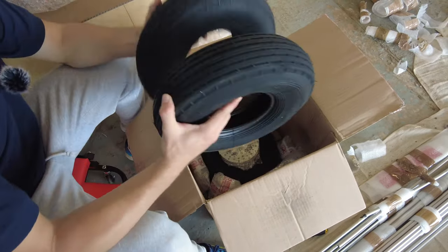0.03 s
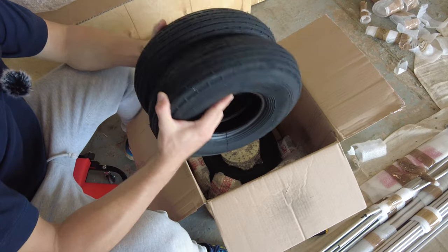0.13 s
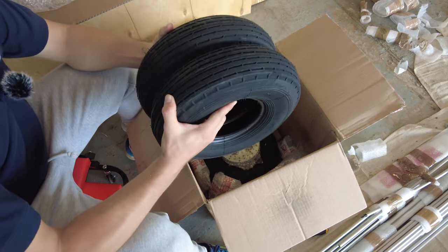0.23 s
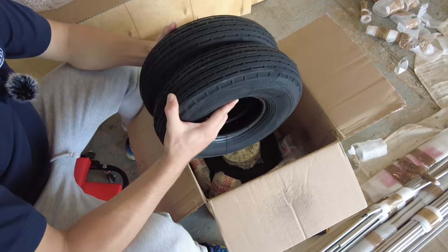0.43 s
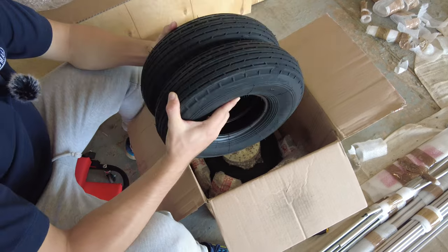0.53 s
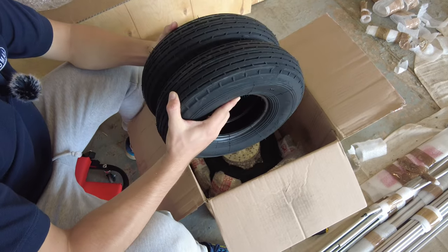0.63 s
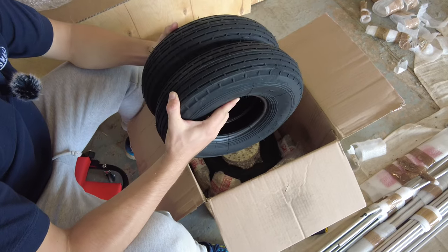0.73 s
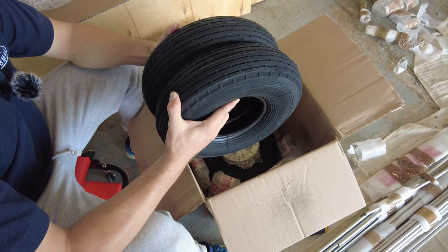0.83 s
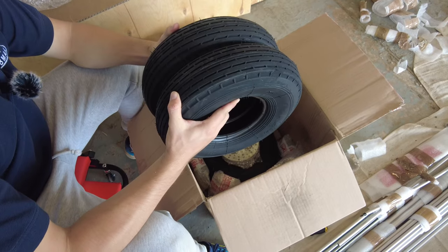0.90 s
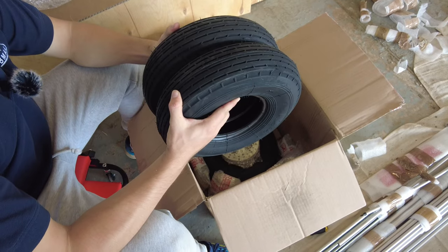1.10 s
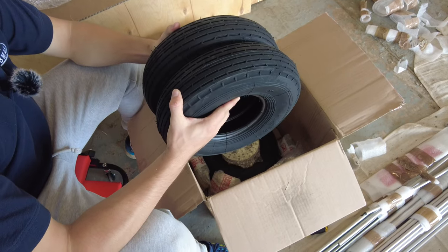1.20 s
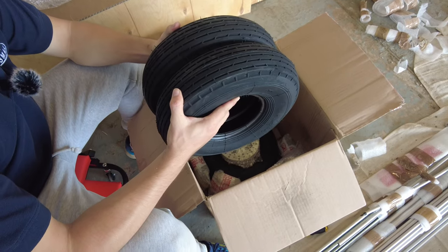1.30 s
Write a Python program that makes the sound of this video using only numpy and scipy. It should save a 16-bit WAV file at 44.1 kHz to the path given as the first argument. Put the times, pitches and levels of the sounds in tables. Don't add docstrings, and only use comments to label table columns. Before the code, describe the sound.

Hollow rubbery thump of a tyre on a cardboard box, then small bounces and faint ticks

```python
import sys
import numpy as np
from scipy import signal
from scipy.fft import rfft, irfft, next_fast_len
from scipy.io import wavfile
from scipy.ndimage import map_coordinates

SR = 44100
rng = np.random.default_rng(int(sys.argv[2]) if len(sys.argv) > 2 else 0)


def magnitude_from_level(level_db):
    exponent = np.asarray(level_db, float) / 20
    return 10 ** exponent


def generate_wav(signal):
    frames = np.transpose(np.atleast_2d(signal))
    scaled = np.clip(frames, -1, 1) * 32767
    pcm = np.round(scaled).astype(np.int16)
    wavfile.write(sys.argv[1], SR, pcm)


N = 59535


def unit(x):
    return x / np.sqrt(np.mean(x ** 2) + 1e-20)


def along(points, hz):
    f, v = np.transpose(points)
    return np.interp(np.log(hz + 1), np.log(f + 1), v)


def wobble(rate):
    knots = rng.standard_normal(int(N * rate / SR) + 4)
    return map_coordinates(knots, [np.arange(N) * rate / SR])


def filtered(x, response):
    m = next_fast_len(len(x) + 8192)
    return irfft(rfft(x, m) * response(np.fft.rfftfreq(m, 1 / SR)), m)[:len(x)]


def peak(f, hz, width):
    return 1j * f * width / (hz * hz - f * f + 1j * f * width)


def noise(spectrum, size):
    return unit(filtered(rng.standard_normal(size), lambda f: magnitude_from_level(along(spectrum, f))))


def add(track, s, x):
    part = track[round(s * SR):][:len(x)]
    part += x[:len(part)]


def background():
    # time in seconds, then the levels in dB of
    hum_levels = [
        (0, -63.5, -73, -81),
        (.12, -60, -77, -75.5),
        (0.452, -68, -68.5, -93.5),
        (.7, -66.5, -68.5, -95.5),
        (1.35, -67, -67.5, -90.5),
    ]
    # frequency in Hz, density in dB per Hz.
    hiss_colour = [(150, -27), (190, -14), (330, -23), (424, -22.5), (911, -19.5), (1400, -26.5),
                   (5000, -35.5), (12500, -42.5), (13000, -72)]
    # frequency in Hz, density in dB per Hz.
    rumble_colour = [(10, -2), (28, -1.5), (55, -8.5), (110, -20), (180, -35.5), (250, -120)]
    hum_hz, drift_hz, hum_sway_db = 78.2, 0.4, 1
    hollow_hz, hollow_width_hz = 310, 140
    hiss_db, hiss_sway_db = -76, 0.6
    rumble_db, rumble_sway_db = -64, 3

    s, *columns = np.transpose(hum_levels)
    low, octave, hollow = [np.interp(np.arange(N) / SR, s, c) for c in columns]
    phase = 2 * np.pi * np.cumsum(hum_hz + drift_hz * wobble(7.2)) / SR
    hum = np.zeros(N)
    for k, partial_db in enumerate([low, octave]):
        swaying = np.sqrt(2) * magnitude_from_level(partial_db + hum_sway_db * wobble(4))
        hum += swaying * np.sin((k + 1) * phase + k)
    murmur = filtered(rng.standard_normal(N), lambda f: peak(f, hollow_hz, hollow_width_hz) ** 2)
    air = magnitude_from_level(hollow) * unit(murmur)
    hiss = magnitude_from_level(hiss_db + hiss_sway_db * wobble(16)) * noise(hiss_colour, size=N)
    rumble = magnitude_from_level(rumble_db + rumble_sway_db * wobble(6.63)) * noise(rumble_colour, size=N)
    return hum + air + hiss + rumble


def ticks():
    # start in
    # seconds, peak level in dB, pitch in Hz, bandwidth in Hz, 60 dB decay time in seconds.
    tick_events = [(.0115, -67, 9000, 2860, 0.011), (.0413, -63, 2660, 800, 0.022),
                   (.0868, -65, 8230, 4200, 0.019), (.1037, -68.5, 2500, 920, 0.047),
                   (.1456, -55.5, 8040, 2780, .012), (.1495, -72, 8490, 1450, .02),
                   (.15, -63, 2770, 850, 0.027), (.1505, -69, 5400, 870, .015),
                   (.5745, -61.5, 6940, 7100, 0.045), (.5791, -48.5, 2880, 920, 0.017),
                   (.5792, -48, 10580, 8500, 0.03), (.5793, -59.5, 5900, 900, 0.012),
                   (.646, -69, 3300, 1000, 0.013), (.7746, -68, 6400, 4020, 0.031),
                   (.8071, -64.5, 2890, 1036, .03), (.8073, -66.5, 7230, 5920, 0.073),
                   (.856, -64, 4400, 3480, 0.029), (.8854, -67.5, 6160, 7160, 0.013),
                   (.9515, -56.5, 1300, 341, 0.012), (.9722, -64, 6490, 7000, 0.017),
                   (1.1059, -66, 6000, 3735, 0.017), (1.1423, -67, 9220, 4120, 0.026),
                   (1.2466, -55, 2570, 550, 0.0058), (1.2565, -59, 2786, 640, 0.016),
                   (.39, -55, 2800, 1176, 0.02), (.391, -63.5, 9160, 2000, 0.0052),
                        (.363, -68.5, 9100, 1974, .02), (1.2468, -59.5, 5950, 5000, .012),
                        (1.247, -66, 1640, 400, .012), (1.259, -56.5, 7430, 2970, 0.005),
                        (1.3445, -70.5, 2860, 900, 0.018), (1.3447, -74, 7730, 3000, 0.0088)]
    rise_s, top_hz = 0.00018, 11800

    out, t = np.zeros(N), np.arange(SR // 20) / SR
    for s, db, hz, width, t60 in tick_events:
        puff = rng.standard_normal(len(t)) * magnitude_from_level(-60 * t / t60) * (1 - np.exp(-t / rise_s))
        puff[2] += 5
        burst = filtered(puff, lambda f: peak(f, hz, width) ** 2 / (1 + (f / top_hz) ** 4))
        add(out, s, magnitude_from_level(db) * burst / np.abs(burst).max())
    return out


def bump(t, length):
    return np.sin(np.pi * np.clip(t / length, 0, 1)) ** 2


def modes(table, t):
    out = np.zeros(len(t))
    for k, (hz, db, t60) in enumerate(table):
        sign = -(-1) ** k
        out += sign * magnitude_from_level(db - 60 * t / t60) * np.sin(2 * np.pi * hz * t)
    return out


def tyre():
    # start in seconds, level in dB, contact time in seconds, crack level in dB.
    blows = [
        (0.1222, -60, 0.0016, -74.5),
        (.2057, -8, .0008, -40),
        (0.2861, -55, 0.0029, -84.5),
        (0.3127, -36.5, 0.003, -68.5),
        (0.3588, -29, 0.0021, -63),
        (0.452, -44.5, .003, -78.5),
    ]
    # frequency in Hz, level in dB, 60 dB decay in seconds.
    air_modes = [(97, -15.5, 0.086), (185.2, -12.5, .06), (260, 0, .075), (317, 0, .08),
                 (413.4, -14.5, 0.022), (262, -31, .6), (311, -36, .5), (165, -28.5, .2), (479, -15.5, .03),
                 (430, -25.5, 0.08)]
    # frequency in Hz, level in dB, 60 dB decay time in seconds.
    tread_modes = [(770, -9.5, .022), (571, -22, .12), (996, -24, .03), (1324, -38, .1), (2304, -38, .06),
                   (2500, -40, .05), (3203, -46, .08), (4300, -40, .02)]
    # frequency in Hz, density in dB per Hz.
    crack_colour = [(590, -16), (1000, -8.5), (1840, -13), (2500, -20), (3300, -34), (3700, -28.5),
                    (6050, -26), (15500, -57)]
    swell_s = 0.002
    tread_lag_s = 0.0015
    crack_gain_db, crack_t60 = 5, 0.04
    buzz_hz, buzz_width_hz, buzz_gain_db, buzz_t60, buzz_rise_s = 2600, 1400, 4.5, 0.074, 0.004

    out, t = np.zeros(N), np.arange(SR // 4) / SR
    for s, db, contact, crack_db in blows:
        force = bump(t[:400], contact)
        force = force / force.sum()
        air = modes(air_modes, t) * (1 - np.exp(-t / swell_s))
        add(out, s, magnitude_from_level(db) * np.convolve(air, force))
        add(out, s + tread_lag_s, magnitude_from_level(db) * np.convolve(modes(tread_modes, t), force))
        crack = noise(crack_colour, size=len(t))
        add(out, s + tread_lag_s, magnitude_from_level(crack_db + crack_gain_db - 60 * t / crack_t60) * crack)
        buzz = unit(filtered(rng.standard_normal(len(t)), lambda f: peak(f, buzz_hz, buzz_width_hz) ** 2))
        buzz_level = magnitude_from_level(crack_db + buzz_gain_db - 60 * t / buzz_t60) * (1 - np.exp(-t / buzz_rise_s))
        add(out, s + tread_lag_s, buzz_level * buzz)
    return out


def box():
    # start in seconds, push level in dB, push length in seconds,
    # direction as a sign.
    pushes = [
        (0.1248, -48, 0.0017, -1),
        (.1816, -21, .0028, 1),
        (0.199, -39.5, 0.0014, 1),
        (.3885, -40, 0.0071, -1),
    ]
    # start in seconds, peak level in dB, 60 dB decay time in seconds.
    paper_snaps = [
        (.1245, -66, .01),
        (.1801, -31, .014),
        (.2013, -43, .03),
        (.2040, -45, .02),
    ]
    # frequency in Hz, density in dB per Hz.
    card_colour = [(300, -36), (700, -12), (1400, 1.5), (2000, 1), (2660, 2), (3600, -11.5), (8500, -18.5),
                   (14500, -43)]
    # frequency in Hz, level in dB, 60 dB decay time in seconds.
    wall_modes = [(300.9, -9, 0.072), (624, -22, 0.036), (1070, -29, 0.061), (2600, -37.5, .04),
                  (2250, -39.5, .05), (2900, -40, .05)]
    recoil, wall_rise_s, snap_rise_s = 0.16, 0.001, 0.0004
    rock_s, rock_hz, rock_db, rock_t60, rock_rise_s = 0.205, 22.1, -34, 0.13, 0.02

    out, t = np.zeros(N), np.arange(SR // 2) / SR
    for s, db, length, way in pushes:
        push = bump(t, length) - recoil * bump(t - 0.8 * length, 2.7 * length)
        add(out, s, np.sign(way) * magnitude_from_level(db) * push)
        add(out, s + length, magnitude_from_level(db) * modes(wall_modes, t) * (1 - np.exp(-t / wall_rise_s)))
    for s, db, t60 in paper_snaps:
        snap = noise(card_colour, size=len(t)) * magnitude_from_level(-60 * t / t60) * (1 - np.exp(-t / snap_rise_s))
        add(out, s, magnitude_from_level(db) * snap / np.abs(snap).max())
    rocking = np.sin(2 * np.pi * rock_hz * t) * (1 - np.exp(-t / rock_rise_s))
    add(out, rock_s, magnitude_from_level(rock_db - 60 * t / rock_t60) * rocking)
    return out


def room(x):
    # frequency in Hz, 60 dB decay time in seconds.
    decay_times = [(60, 0.94), (280, 0.71), (700, 0.64), (2500, .7), (6000, .45), (12000, 0.75)]
    # frequency in Hz, level in dB.
    tail_colour = [(60, 6.5), (280, -7.5), (480, 5), (750, -5), (1400, 8), (2500, 1), (6000, 2.5),
                   (12000, 2.5)]
    build_up_s = 0.0096

    hz, t, z = signal.stft(rng.standard_normal(SR), SR, nperseg=512)
    decay_db = along(tail_colour, hz)[:, None] - 60 * t / along(decay_times, hz)[:, None]
    tail = signal.istft(z * magnitude_from_level(decay_db), SR, nperseg=512)[1]
    tail = tail * (1 - np.exp(-np.arange(len(tail)) / SR / build_up_s))
    return signal.fftconvolve(x, tail / np.linalg.norm(tail))[:N]


def scene():
    room_db, tick_share = -12, 0.4
    hits = tyre() + box()
    echo = magnitude_from_level(room_db) * room(hits + tick_share * ticks())
    return (hits + echo + ticks() + background())[None]


def roll_off(x):
    return signal.sosfilt(signal.butter(12, 15780, fs=SR, output="sos"), x)


def record(dry):
    top_hz = 15800
    mix = filtered(dry[0], lambda f: f < top_hz)[None]
    return roll_off(mix)


dry = scene()
out = record(dry)
generate_wav(out)
```